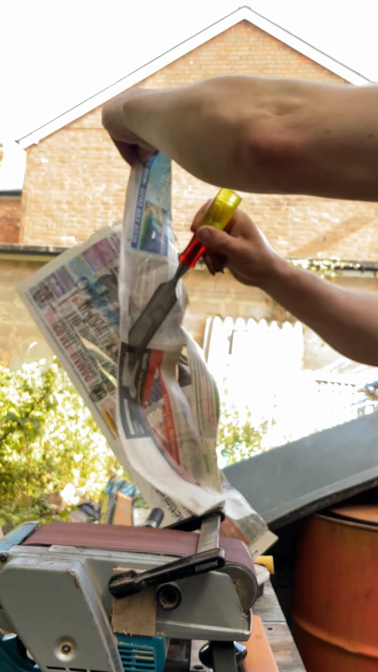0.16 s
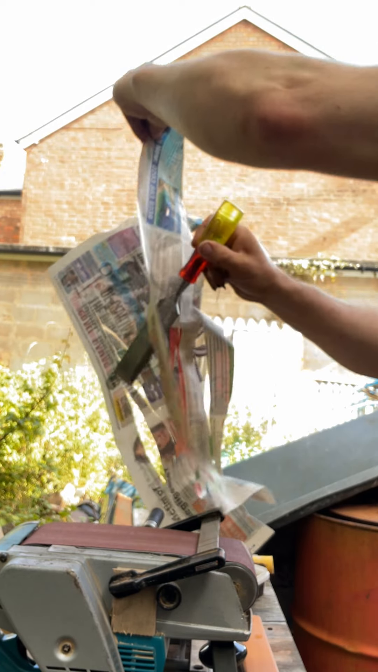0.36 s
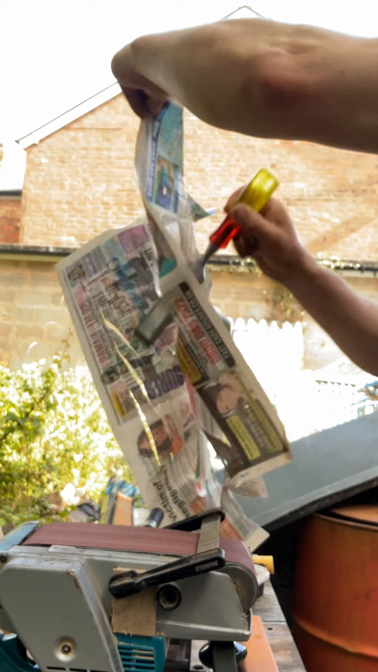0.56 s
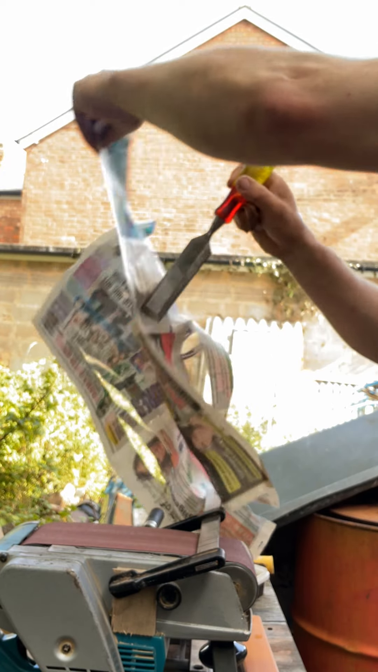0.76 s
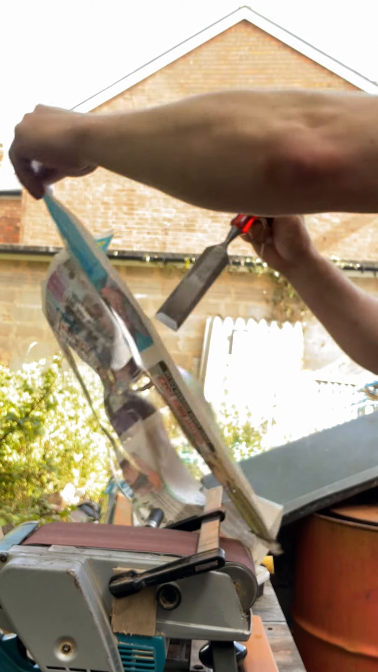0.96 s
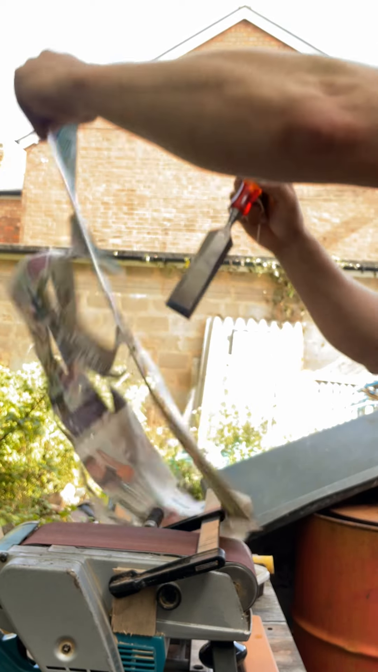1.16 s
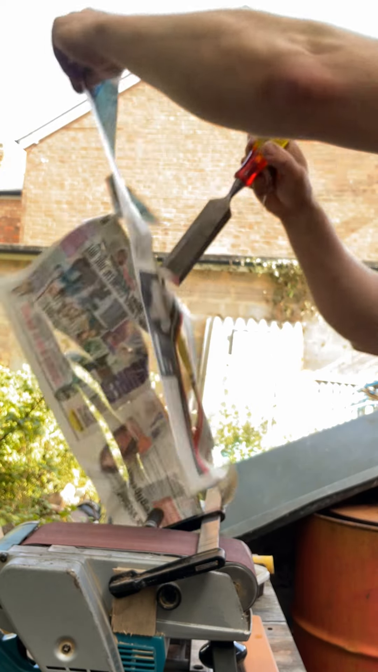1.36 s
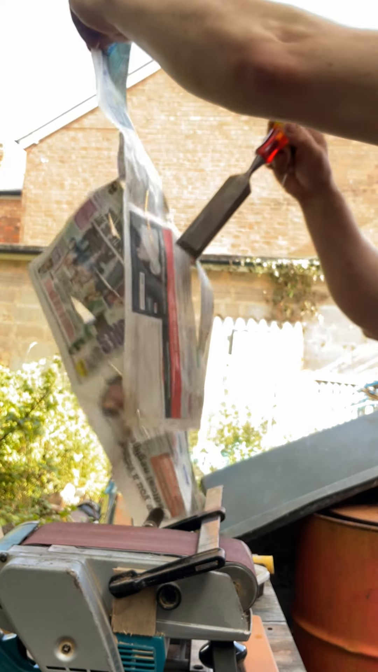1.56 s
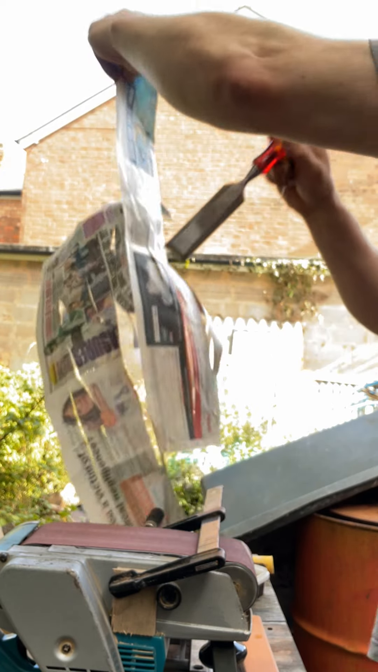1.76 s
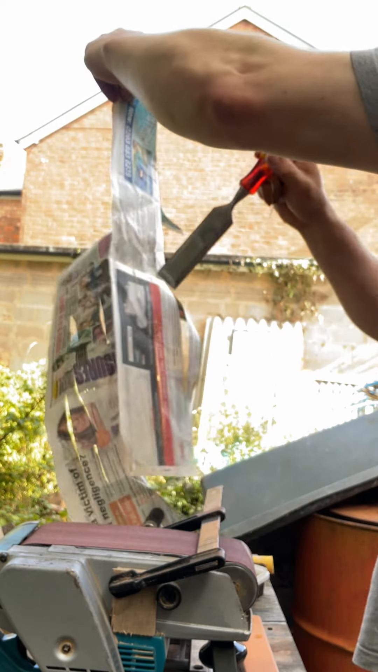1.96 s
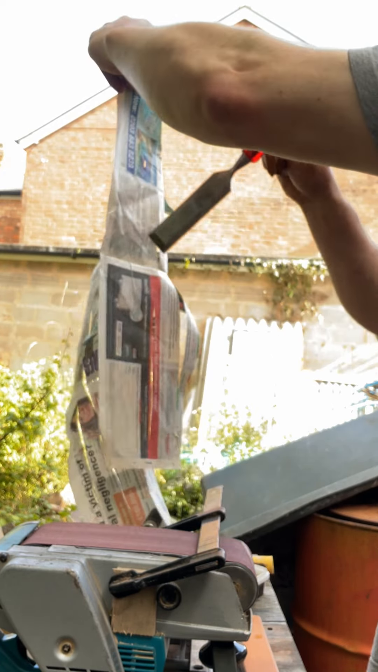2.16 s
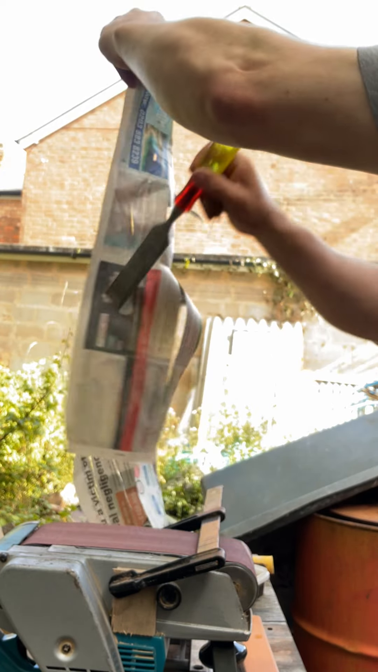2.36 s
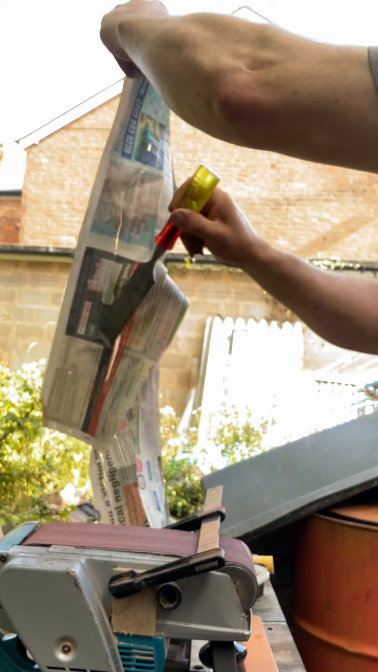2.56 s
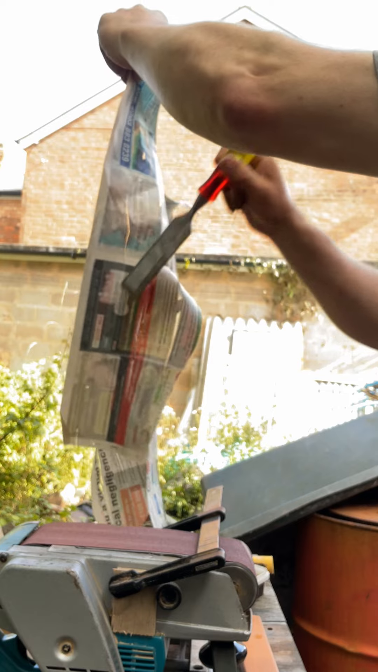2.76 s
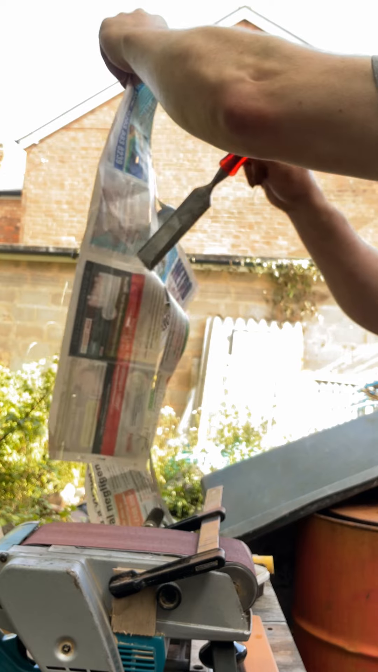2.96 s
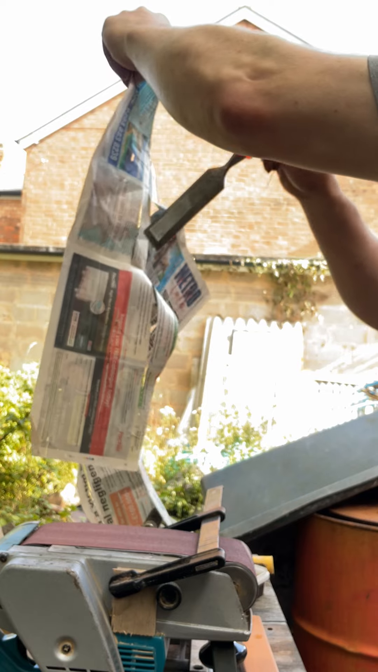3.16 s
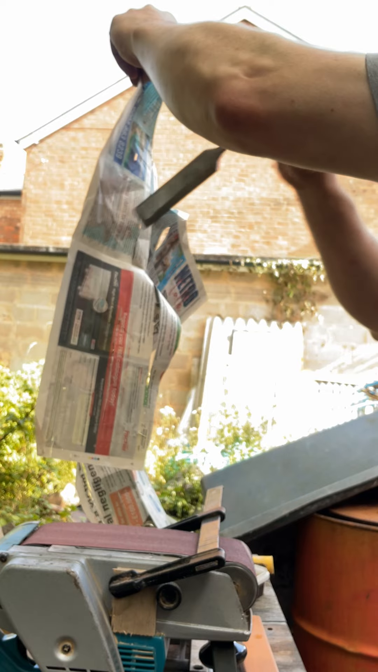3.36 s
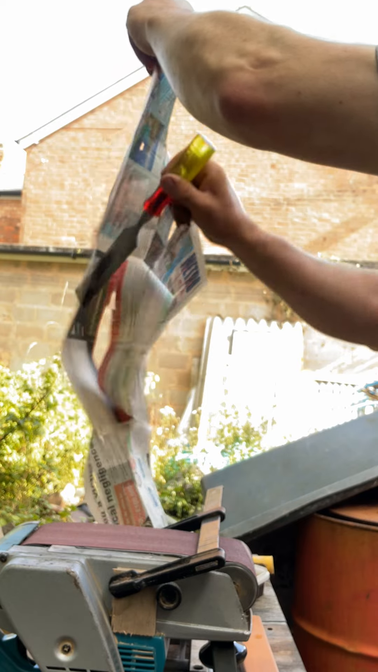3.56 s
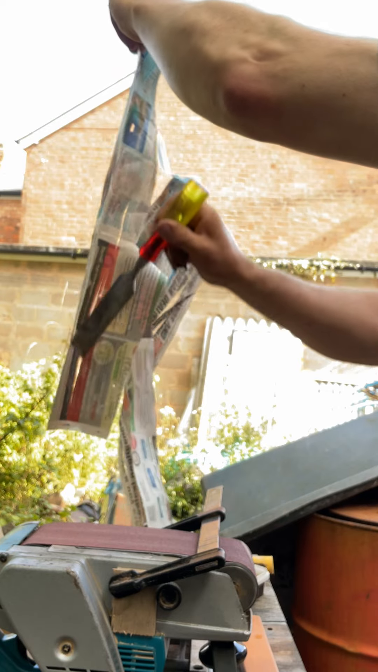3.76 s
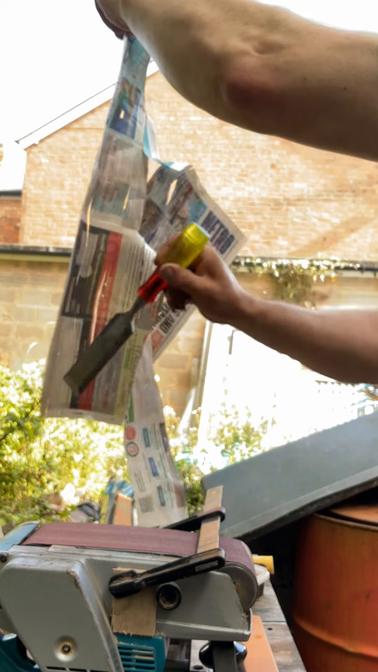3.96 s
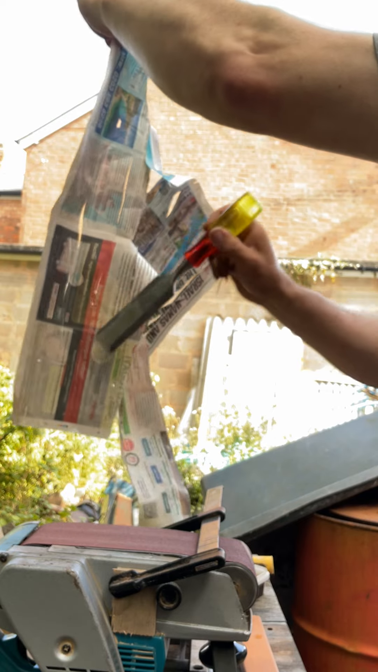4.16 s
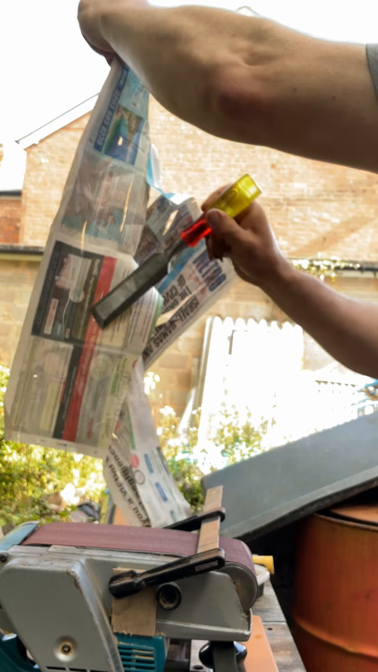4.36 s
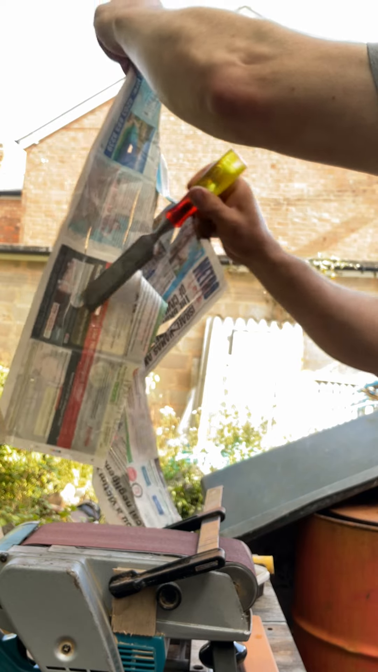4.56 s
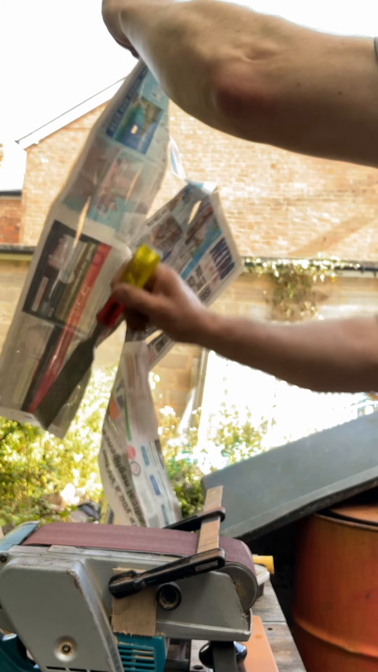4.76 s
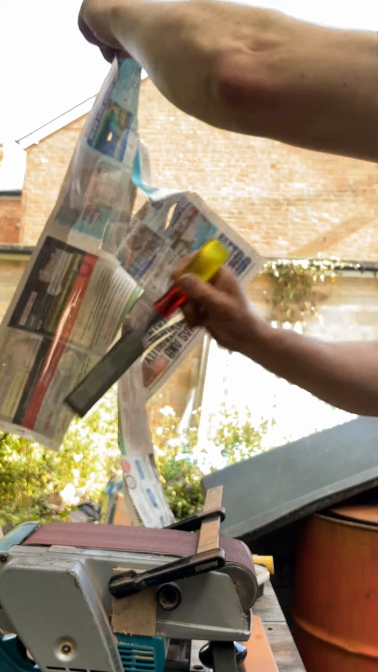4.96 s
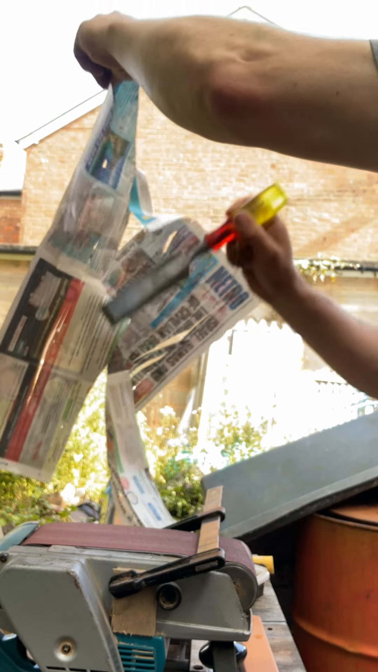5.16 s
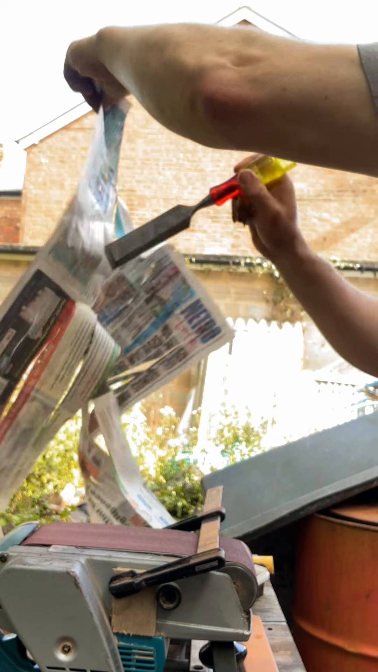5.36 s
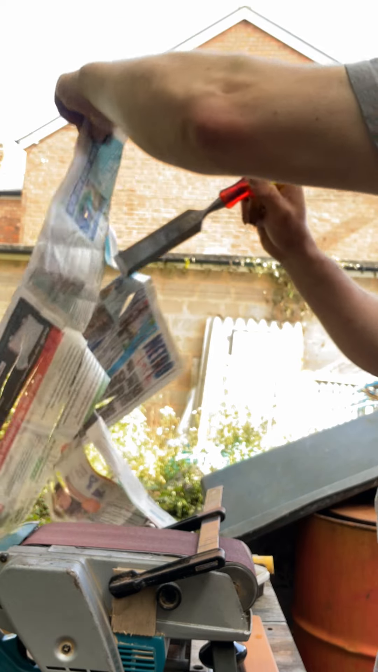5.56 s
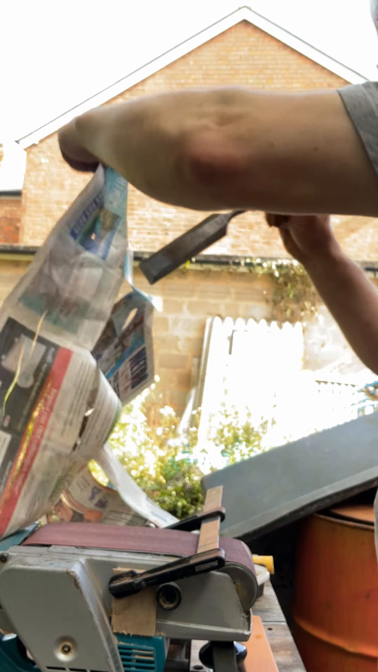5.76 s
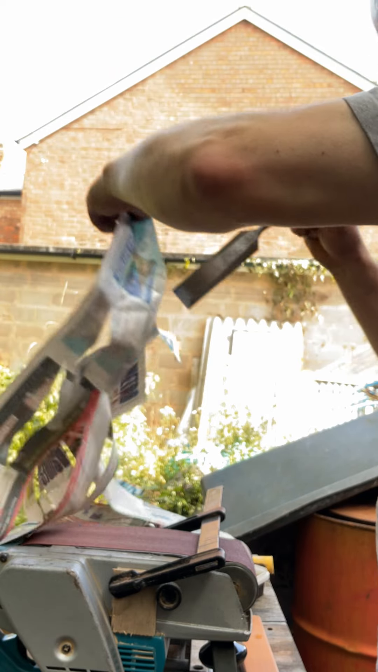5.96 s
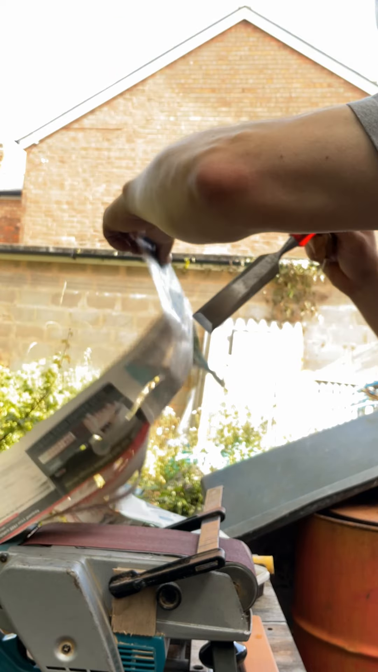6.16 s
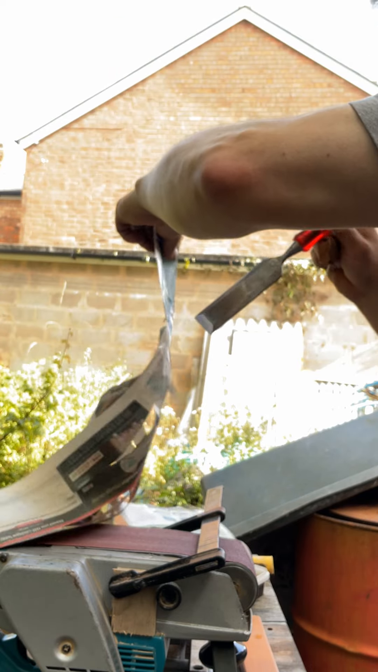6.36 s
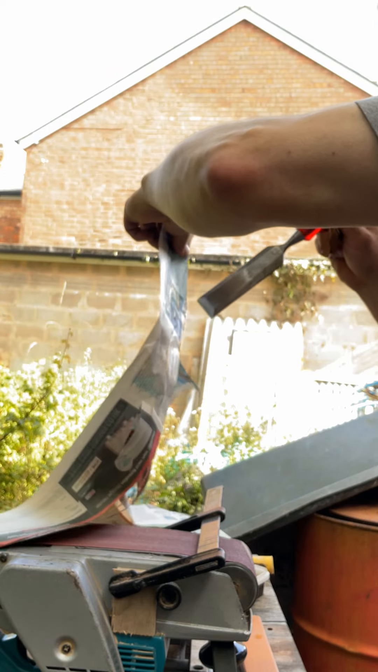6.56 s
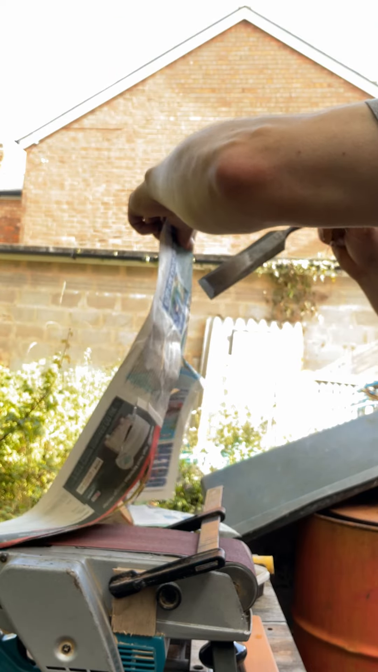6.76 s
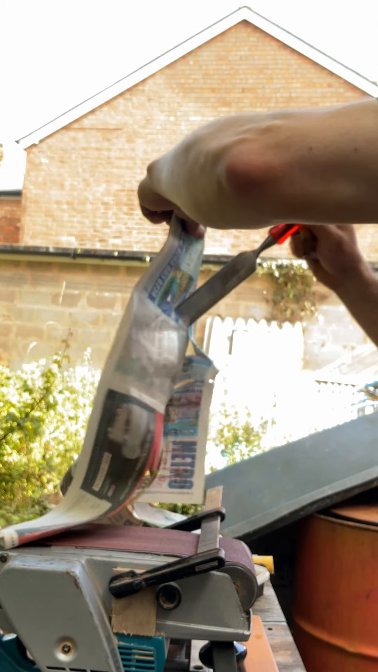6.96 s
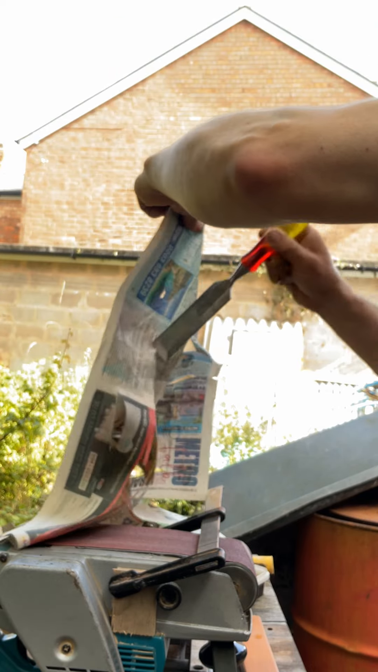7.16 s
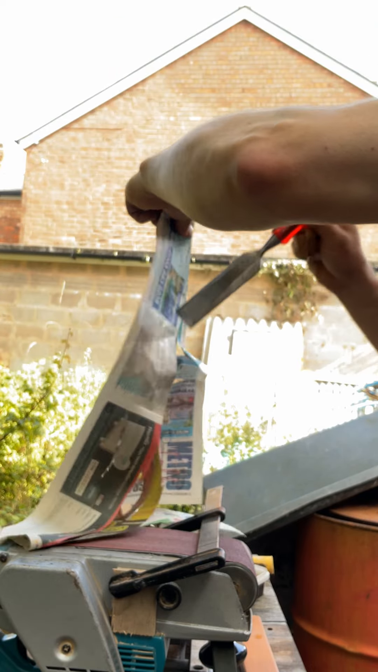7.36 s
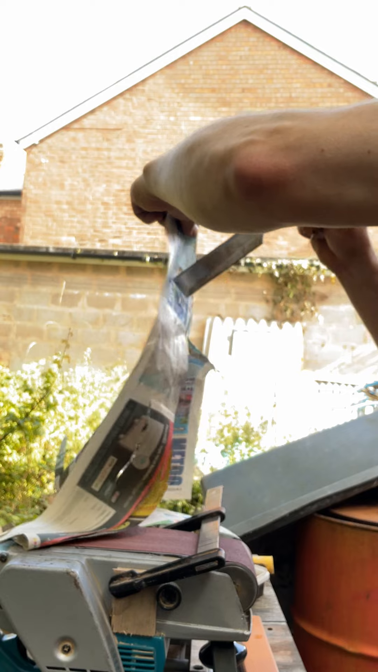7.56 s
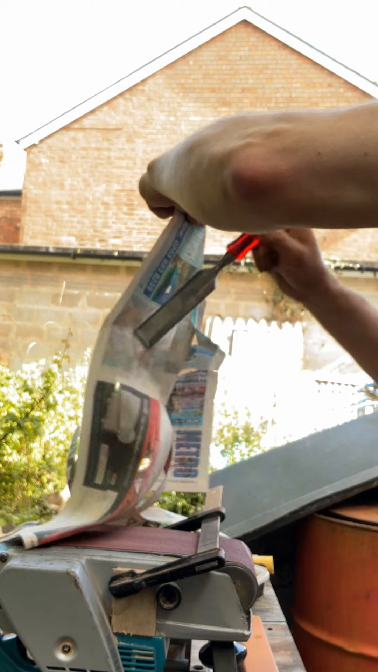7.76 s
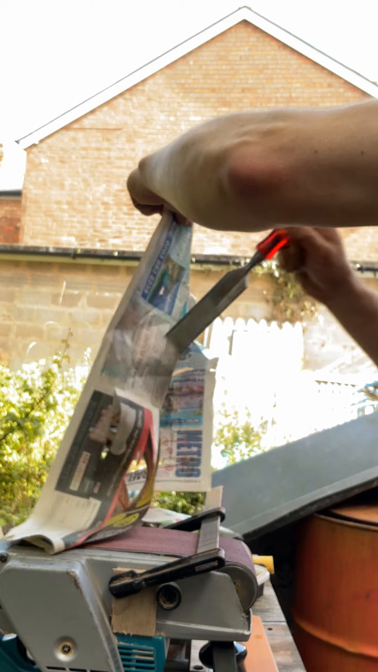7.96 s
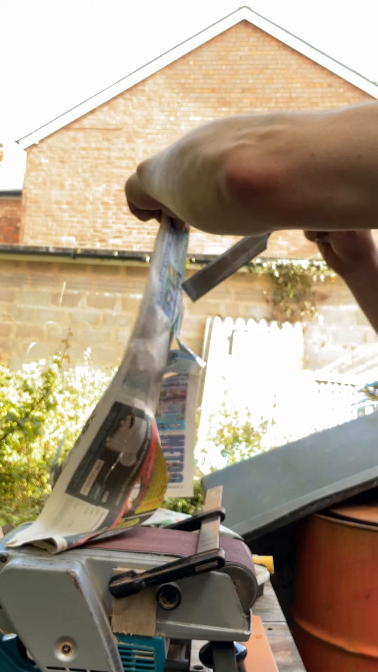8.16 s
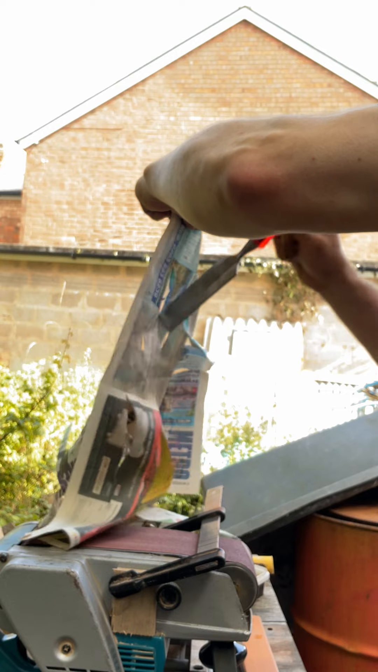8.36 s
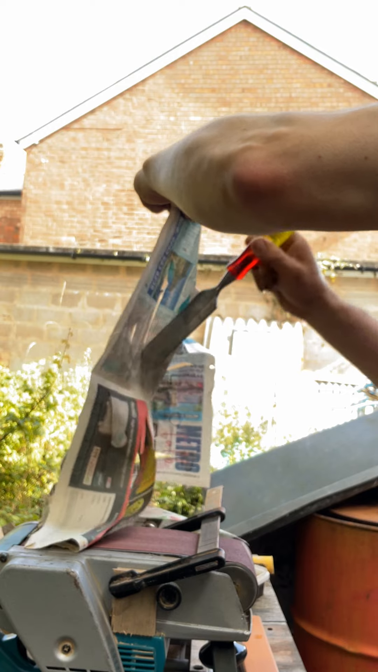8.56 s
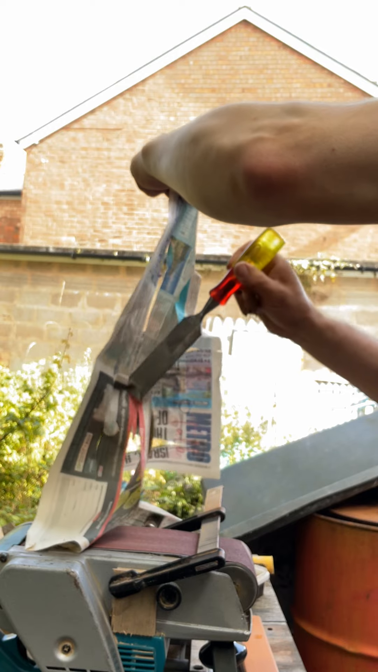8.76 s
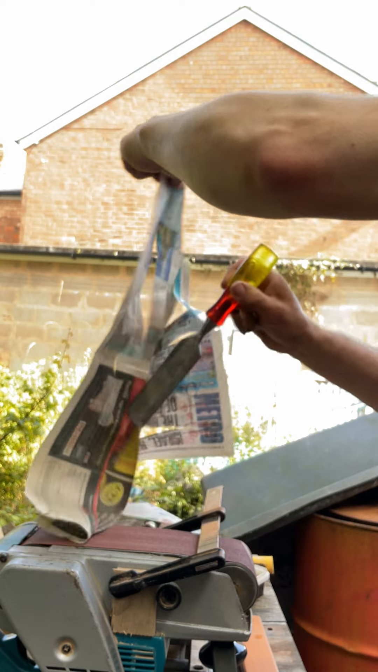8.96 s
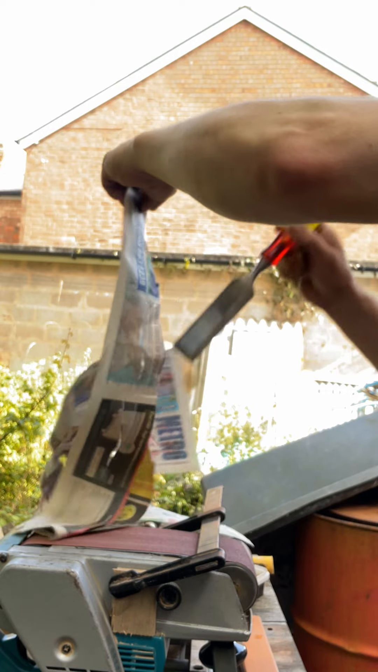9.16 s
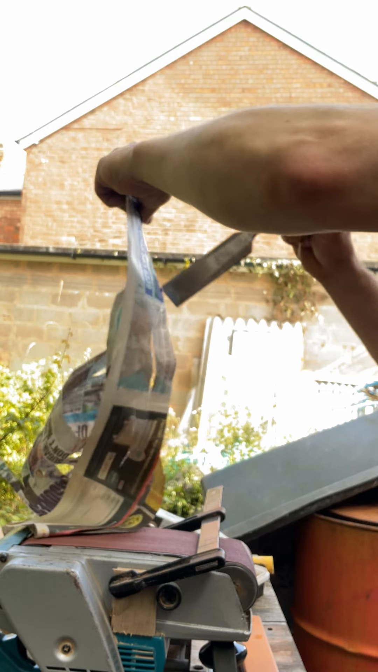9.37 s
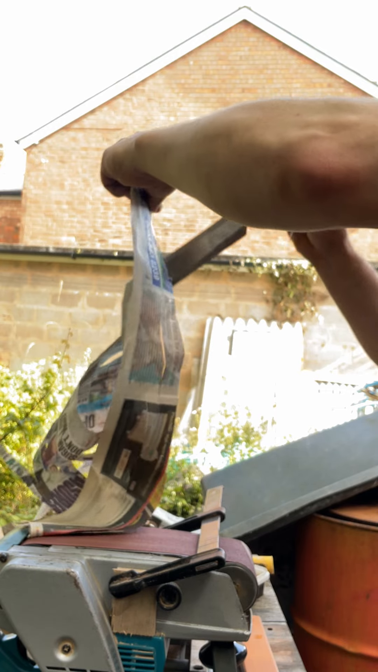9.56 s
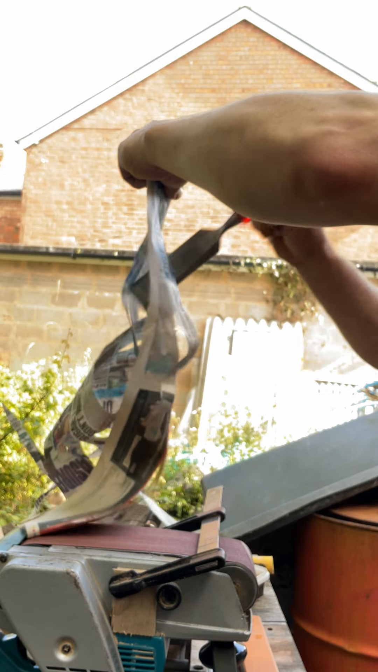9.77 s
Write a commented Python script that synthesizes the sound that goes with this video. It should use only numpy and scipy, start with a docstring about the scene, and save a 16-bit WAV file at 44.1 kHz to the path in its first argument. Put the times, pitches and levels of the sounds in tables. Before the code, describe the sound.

A sharp chisel slices hanging newspaper close by, in a walled yard with a slight echo. Short, hissing rips come from the start until about 1.6 seconds, and the sheet snaps taut with a loud flap at 0.6. A brief cut follows at 2.3, then a stronger slice with a sharp crack around 3.5, and another quick rip at 4.7. Between strokes, loose strips brush together and creases pop. From 5 to 6.5 seconds the paper only rustles and ticks softly. Slicing resumes around 6.9 and 7.6, then a run of cuts from 8.3 builds to a strong, crackling tear near 8.9. Light rustling leads to one last small cut at 9.7. Faint, distant traffic continues throughout, with low rumble, tyre noise and gliding engines, and a faint wavering whine from about 4.3 to 5.5 seconds.

```python
"""A workbench in a walled yard: a sharp chisel slices a hanging sheet of newspaper.
Each stroke snaps a dense stream of fibres that shakes the sheet. Between strokes loose strips brush
each other, creases buckle and pop, and the sheet flaps taut. The walls echo the paper.
Far traffic drones behind: rumble, tyre roar, gliding engines and one brief wavering whine."""
import sys
import numpy as np
from scipy import signal
from scipy.fft import rfft, irfft, next_fast_len
from scipy.io import wavfile
from scipy.ndimage import uniform_filter1d, map_coordinates

SR = 44100
rng = np.random.default_rng(int(sys.argv[2]) if len(sys.argv) > 2 else 0)


def log_audio(samples):
    """Write samples as a 16-bit WAV file to the path given in sys.argv[1]."""
    # one column per channel
    frames = np.atleast_2d(samples).T
    # limit to full scale, then quantise
    limited = np.clip(frames, -1, 1)
    pcm = np.round(limited * 32767).astype(np.int16)
    wavfile.write(sys.argv[1], SR, pcm)


N = 432180
TIME = np.arange(N) / SR

# Blade strokes. Each row: start, rise and length in seconds, tearing level in dB, its change by the end
# in dB, fade in dB/s, flutter, rasp and fizz in dB re tearing (before trims), strip resonance in Hz.
STROKES = [(-0.0, 0.0013, 0.25, -43.5, -2.5, 290, -5.5, 2.2, 2.1, 1320),
           (0.38, 0.07, 0.18, -41.5, -2, 112, -10, -7.5, 3.5, 2300),
           (1.148, 0.021, 0.039, -46, -3, 133, -15, -2.5, -0.2, 2400),
           (1.231, 0.015, 0.016, -44.5, 1.5, 150, -11, -10.5, 3.5, 2400),
           (1.298, 0.1, 0.18, -41, 1, 196, -11.5, -7, 2, 2400),
           (2.307, 0.076, 0.076, -42.5, 3.5, 252, -17, -9.5, -4, 2700),
           (3.462, 0.028, 0.098, -34, -3.5, 264, -15.5, -6, 4, 2800),
           (3.57, 0.051, 0.25, -40.5, -12.5, 269, -12.5, -7.8, 6.5, 2400),
           (4.608, 0.092, 0.044, -41.5, 9, 287, -28, -8.2, 0.8, 2490),
           (4.695, 0.022, 0.031, -40, -1, 264, -12, -16, 6.5, 2440),
           (6.887, 0.058, 0.12, -44.0, 0, 151, -13.5, -4.5, 0.2, 2200),
           (7.085, 0.05, 0.092, -43, 0, 193, -8, -2, 3, 2200),
           (7.618, 0.12, 0.18, -42, -0.5, 182, -13, -4.5, 2, 2370),
           (8.276, 0.052, 0.12, -47.5, 4.5, 183, -6.5, -3.5, 6.5, 1910),
           (8.398, 0.029, 0.22, -52, 5, 157, -2.5, -3.5, 6.5, 1650),
           (8.586, 0.16, 0.14, -42, -1, 149, -6.5, 1, 4, 1700),
           (8.773, 0.012, 0.046, -39, -0.5, 122, -24, -11.4, 4, 2300),
           (8.811, 0.081, 0.1, -35.7, -4.5, 195, -9, -1.5, 3, 2200),
           (9.698, 0.076, 0.12, -49, 4.5, 198, -13, -2, 3, 2200)]


def amp(db):
    """Decibels to gain."""
    return 10 ** (np.asarray(db) / 20)


def unit(x):
    """Scale to rms 1."""
    return x / np.sqrt(np.mean(x ** 2) + 1e-20)


def along(points, hz):
    """Interpolate (Hz, value) points on a log axis."""
    knots_hz, values = np.transpose(points)
    return np.interp(np.log(hz + 1), np.log(knots_hz + 1), values)


def curves(rows):
    """One value per sample for each column after the time."""
    times_s, *columns = np.transpose(rows)
    return [np.interp(TIME, times_s, column) for column in columns]


def wobble(rate_hz):
    """Smooth random curve, rate_hz knots a second."""
    return map_coordinates(rng.standard_normal(8192), [TIME * rate_hz], mode="wrap")


def below(hz, edge_hz, order=8):
    """Low-pass gain."""
    return 1 / np.sqrt(1 + (hz / edge_hz) ** order)


def above(hz, edge_hz, order=8):
    """High-pass gain."""
    return np.sqrt(1 - below(hz, edge_hz, order) ** 2)


def filtered(x, response):
    """Apply a gain given as a function of Hz."""
    n = x.shape[-1]
    padded = next_fast_len(n + 8192)
    return irfft(rfft(x, padded) * response(np.fft.rfftfreq(padded, 1 / SR)), padded)[..., :n]


def band(x, colour_db, lo_hz, hi_hz):
    """Colour, band-pass and scale to rms 1."""
    return unit(filtered(x, lambda hz: amp(colour_db(hz)) * above(hz, lo_hz) * below(hz, hi_hz)))


def causal(gain):
    """Minimum-phase response with this gain: rings only after a blow."""
    cepstrum = irfft(np.log(np.maximum(gain, 1e-6)))
    half = len(cepstrum) // 2
    cepstrum[1:half] *= 2
    cepstrum[half + 1:] = 0
    return np.exp(rfft(cepstrum))


def add(track, start_s, sound):
    """Mix a sound in at a time."""
    part = track[max(round(start_s * SR), 0):][:len(sound)]
    part += sound[:len(part)]


def traffic():
    """Far rumble, tyre roar and faint hiss: three bands of noise."""
    # Each row: time in seconds, rumble and tyre roar in dB before trims.
    levels = [(0.0, -64.5, -59.5), (1.3, -67.5, -61.5), (2.3, -72.5, -62), (3.3, -69, -66.5),
              (4.2, -70.5, -66), (4.9, -74, -61), (6.0, -67.5, -58.5), (6.7, -73.5, -64), (8.4, -68, -57.5),
              (9.8, -71, -57.5)]
    # Background spectrum. Each row: frequency in Hz, gain in dB.
    spectrum = [(15, -34), (25, -7), (37, -5), (96, -14.5), (211, -16), (284, -13), (403, -15), (437, -14),
                (791, -20), (955, -18.5), (1780, -31), (7030, -32.5), (7830, -32.5), (10500, -34.5),
                (15800, -31)]
    rumble_db, roar_db = curves(levels)
    air = lambda lo_hz, hi_hz: band(rng.standard_normal(N), lambda hz: along(spectrum, hz), lo_hz, hi_hz)
    rumble = amp(rumble_db + 2) * air(48, 140)
    roar = amp(roar_db - 4.5) * air(140, 1800)
    hiss = air(1800, SR) * amp(-71.5 + 0.5 * wobble(3.4))
    return rumble + roar + hiss


def drone(pitch_hz, rough, scatter_hz):
    """Far tone; many paths smear the rough share of its power."""
    phase = 2 * np.pi * np.cumsum(pitch_hz) / SR
    share = np.clip(rough, 0, 1)
    smear = wobble(scatter_hz) * np.sin(phase) + wobble(scatter_hz) * np.cos(phase)
    return np.sqrt(2 * (1 - share)) * np.sin(phase) + np.sqrt(share) * smear


def engines(fall_db=8.5):
    """Far engines swell and fade, gliding as they change speed."""
    # Each row: peak time and half length in seconds, pitch in Hz, glide in Hz/s, dB before trim.
    passes = [(1.722, 0.39, 75.5, 12, -65.5), (2.946, 0.55, 96, 17.5, -71.5),
              (3.383, 0.065, 59, 11.5, -59.5), (4.096, 0.38, 283, -86.5, -72.5),
              (4.147, 0.51, 85.7, -11.5, -70.5), (5.1, 0.29, 97, 28, -69.5), (5.62, 0.38, 55.3, 3, -62.5),
              (7.2, 0.92, 81, 20.5, -70), (9.395, 1.34, 92.5, -3.5, -71)]
    out = np.zeros(N)
    for peak_s, half_s, pitch_hz, glide_hz_per_s, db in passes:
        t = TIME - peak_s
        level_db = np.maximum(db + 3 - fall_db * (t / half_s) ** 2, -200)
        out += amp(level_db) * drone(pitch_hz + glide_hz_per_s * t, rough=0.44, scatter_hz=12)
    return out


def whine(fade_s=0.037):
    """A far, rough tone wavers up and back down."""
    # Each row: time in seconds, pitch in Hz, level in dB before trim, roughness from 0 to 1.
    contour = [(4.25, 360, -71, 0.7), (4.47, 399, -58.5, .8), (4.68, 430, -84, .7), (4.74, 440, -55.5, 0.3),
               (4.95, 427, -57, 0.58), (5.17, 417, -58.5, 0.83), (5.41, 349, -60.5, 0.37),
               (5.5, 349, -84, .6)]
    pitch_hz, db, rough = curves(contour)
    inside_s = np.minimum(TIME - contour[0][0], contour[-1][0] - TIME)
    gate = np.clip(inside_s / fade_s + 0.5, 0, 1)
    return gate * amp(db + 1) * drone(pitch_hz, rough, scatter_hz=226.3)


def wall_echo(x, build_s=0.004):
    """The walls answer, each frequency dying at its own speed."""
    # Each row: frequency in Hz, T60 in seconds.
    decay = [(150, 0.54), (1000, 0.46), (5000, 0.3), (15000, 0.25)]
    hz, t, spectra = signal.stft(rng.standard_normal(SR * 3 // 4), SR, nperseg=256)
    tail = signal.istft(spectra * amp(-60 * t / along(decay, hz)[:, None]), SR, nperseg=256)[1]
    tail *= 1 - np.exp(-np.arange(len(tail)) / SR / build_s)
    return signal.fftconvolve(x, tail / np.linalg.norm(tail))[:N]


def paper_colour_db(hz):
    """Fixed peaks and a dip that colour the paper's sound."""
    # Each row: centre and width in Hz, gain in dB.
    ripple = [(556, 120, 3), (1060, 220, 2.5), (1430, 160, 1), (1700, 215, -3.5), (2270, 230, 1.5),
              (4020, 300, 5), (4610, 140, 1.5), (4880, 190, 3)]
    return sum(db / (1 + (2 * (hz - centre_hz) / width_hz) ** 2) for centre_hz, width_hz, db in ripple)


def patchy(x, depth_db):
    """Resonances come and go as the sheet bends."""
    spectra = signal.stft(x, nperseg=512)[2]
    field = uniform_filter1d(rng.standard_normal(spectra.shape), size=4, axis=0)
    field = uniform_filter1d(field, size=14, axis=1)
    return signal.istft(spectra * amp(depth_db * unit(field)), nperseg=512)[1][:N]


def fibres(snaps_per_s, spread_db, clump_db, clump_hz, bundles_per_s, bundle_db):
    """Tiny uneven snaps in clumps; now and then a thick bundle breaks."""
    snaps = (rng.random(N) < snaps_per_s / SR) * rng.choice([-1, 1], N)
    sizes = amp(spread_db * np.clip(rng.standard_normal(N), -3, 2))
    bundles = (rng.random(N) < bundles_per_s / SR) * rng.uniform(-1, 1, N)
    clumps = amp(clump_db * wobble(clump_hz))
    return unit(unit(snaps * sizes * clumps) + amp(bundle_db) * bundles)


def gesture(start_s, rise_s, length_s, fade_db_per_s, change_db=0, catch_db=-20, catch_s=0.0021):
    """Gain of one movement: it catches, swells, holds and dies away."""
    t = np.maximum(TIME - start_s, 0)
    swell_db = catch_db * np.maximum(1 - t / rise_s, 0) ** 2
    hold_db = change_db * np.minimum(t / length_s, 1)
    release_db = -fade_db_per_s * np.maximum(t - length_s, 0)
    return np.minimum(t / catch_s, 1) * amp(np.maximum(swell_db + hold_db + release_db, -200))


def together(gains, db):
    """Movements at their own levels add in power."""
    return np.sqrt(amp(db) ** 2 @ gains ** 2)


def swaying(rise_s=0.034, fade_db_per_s=166):
    """Loose strips brush each other: tiny snaps, sparser than in a cut."""
    # Each row: start and length in seconds, rustle in dB, fizz in dB re rustle (both before trims).
    sways = [(0.26, 0.16, -57.5, 4), (0.72, 0.076, -62, 1), (0.781, 0.052, -55, 7), (0.851, 0.054, -72, -6),
             (1.084, 0.082, -59.5, -3), (1.772, 0.025, -68, 7), (2.494, 0.038, -60.5, 2.5),
             (2.675, 0.03, -68, -4), (3.873, 0.028, -66.5, 0), (4.319, 0.035, -77.5, 9),
             (4.934, 0.082, -75, 8.5), (5.012, 0.232, -68.5, -4), (5.278, 0.14, -65.5, 7),
             (5.51, 0.068, -62, 2), (5.646, 0.048, -67.5, 4), (5.735, 0.17, -57, -6),
             (5.903, 0.074, -58.5, 4.5), (6.029, 0.076, -54, 7), (6.14, 0.037, -58.0, 2),
             (6.231, 0.075, -59.8, 5), (6.38, 0.19, -74.5, -1), (9.008, 0.106, -61, 0),
             (9.123, 0.033, -50.5, 3.5), (9.22, 0.12, -60, 5), (9.44, 0.043, -66, 5),
             (9.585, 0.029, -67.5, -10)]
    # Each row: frequency in Hz, gain in dB.
    spectrum = [(290, -31), (500, 0), (649, -17), (817, -2.5), (1540, 1), (3570, -5), (4060, -4),
                (8610, -17), (15100, -10), (15800, -9)]
    gains = np.array([gesture(start_s, rise_s, length_s, fade_db_per_s)
                      for start_s, length_s, *_ in sways])
    rustle_db, fizz_db = np.transpose(sways)[2:]
    snaps = fibres(7600, spread_db=1, clump_db=1.94, clump_hz=120, bundles_per_s=83, bundle_db=12.5)
    paper_db = lambda hz: along(spectrum, hz) + 0.46 * paper_colour_db(hz)
    rustle = together(gains, rustle_db + 0.9) * band(patchy(snaps, depth_db=3), paper_db, 420, 8200)
    fizz = together(gains, rustle_db + fizz_db - 0.5) * band(snaps, paper_db, 7230, SR)
    return rustle + fizz


def ticks(gap_s=0.066, peak_db=-53, centre_hz=1030, treble_db=-37):
    """Rows for creases(): small folds give way at random as the hand bends the sheet."""
    # Each row: start and end in seconds.
    bends = [(2.075, 2.22), (5.06, 6.45)]
    slots_s = np.concatenate([np.arange(start_s, end_s, gap_s) for start_s, end_s in bends])
    return [(slot_s + gap_s * late / 3, peak_db + 1.15 * size, centre_hz * np.exp(0.25 * pitch), treble_db)
            for slot_s, (late, size, pitch) in zip(slots_s, rng.standard_normal((len(slots_s), 3)))]


def creases(ring_cycles=20, settle_s=0.0071, settle_db=-11.5, shiver_db=-20, shiver_cycles=150):
    """A crease buckles, settles with a weaker pop and shivers; small patches stop soonest."""
    # Each row: start in seconds, peak in dB, centre in Hz, relative treble in dB before scaling.
    pops = [(0.301, -37, 2860, -17), (0.941, -46.5, 1510, -18), (1.036, -47.5, 1020, -21),
            (1.111, -37.5, 2600, -16), (1.243, -27.5, 4440, -10), (1.763, -47.5, 990, -36),
            (1.831, -46, 1200, -35), (2.242, -53.5, 1000, -32), (2.326, -31.5, 1690, -4),
            (2.508, -43, 2140, -26), (2.619, -51.5, 1610, -31), (2.791, -53, 2520, -19),
            (3.467, -33.5, 4160, -13), (3.538, -16.5, 4300, -11), (3.558, -27.5, 2000, -20),
            (4.621, -45, 1110, -19), (4.72, -24, 2160, 2), (5.036, -46, 2110, -34),
            (5.096, -37.5, 5070, -30), (5.219, -37.5, 1510, -16), (5.339, -43, 4416, -18),
            (5.493, -48.5, 1760, -28), (5.667, -40.5, 1810, -38), (5.772, -39.5, 1350, -27),
            (5.797, -38, 1350, -17), (5.896, -35, 1390, -31), (6.033, -36, 1520, -8),
            (6.062, -40, 1700, -8), (6.335, -43, 2180, -32), (6.869, -46, 1260, -30),
            (6.909, -33, 2880, -24), (7.345, -44, 945, -29), (7.624, -44, 1430, -31),
            (8.296, -38, 2970, -13), (8.892, -23.5, 2340, -29), (8.952, -26, 1700, -10),
            (9.089, -39.5, 2400, -6), (9.286, -37.5, 1420, -6), (9.733, -31.5, 3650, 0)]
    out, t = np.zeros(N), np.arange(8192) / SR
    hz = np.fft.rfftfreq(len(t), 1 / SR)
    buckle = lambda cycles: amp(-60 * cycles / ring_cycles) * (1 - np.exp(-cycles))
    for start_s, peak_db, centre_hz, treble_db in pops + ticks():
        delay_s = settle_s * np.exp(0.3 * rng.standard_normal())
        settle = amp(settle_db) * buckle(np.maximum(t - delay_s, 0) * centre_hz)
        shiver = amp(shiver_db - 60 * t * centre_hz / shiver_cycles)
        burst = rng.standard_normal(len(t)) * (buckle(t * centre_hz) + settle + shiver)
        top = below(hz, 1.01 * centre_hz, order=5) + 0.23 * amp(treble_db)
        patch = above(hz, 0.78 * centre_hz, order=6) * top * below(hz, 11000)
        pop = irfft(rfft(burst) * causal(patch))
        add(out, start_s, amp(peak_db) * pop / np.abs(pop).max())
    return out


def flaps(rebound_s=0.0053, rebound_db=-2.5, shudder_db=-25, shudder_t60_s=0.11):
    """The sheet cracks taut like a sail, rebounds once and shudders."""
    # Each row: start in seconds, peak in dB, low-pass edge in Hz.
    cracks = [(.587, -15, 2700), (4.593, -41.5, 700)]
    # Each row: frequency in Hz, gain in dB.
    spectrum = [(50, -10), (95, -5), (220, -2.5), (400, -4), (700, 3.5), (1050, 0), (1700, -10), (2700, -3),
                (4300, -10.5), (9000, -33)]
    out, t = np.zeros(N), np.arange(8192) / SR
    hz = np.fft.rfftfreq(len(t), 1 / SR)
    rebound = amp(rebound_db) * below(hz, 1300, order=4) * np.exp(-2j * np.pi * hz * rebound_s)
    dispersion = np.exp(-1j * 0.094 * np.sqrt(hz))  # low bending waves travel more slowly
    for start_s, peak_db, edge_hz in cracks:
        shudder = rfft(rng.standard_normal(len(t)) * amp(shudder_db - 60 * t / shudder_t60_s))
        body = causal(amp(along(spectrum, hz)) * below(hz, edge_hz, order=4))
        flap = irfft((1 + rebound + shudder) * dispersion * body)
        add(out, start_s, amp(peak_db) * flap / np.abs(flap).max())
    return out


def taut_strip(x, lift_db=1, width_octaves=0.34, sag_hz_per_s=900):
    """Lift the strip's resonance, which sinks as each cut grows longer."""
    hz, t, spectra = signal.stft(x, SR, nperseg=512)
    ring_hz = np.full(len(t), STROKES[0][-1], float)
    for start_s, _, length_s, *_, first_hz in STROKES:
        sag_hz = sag_hz_per_s * np.clip(t - start_s, 0, length_s)
        ring_hz = np.where(t < start_s, ring_hz, first_hz - sag_hz)
    detune = np.log2((hz[:, None] + 1) / ring_hz) / width_octaves
    return signal.istft(spectra * amp(lift_db * np.exp(-detune ** 2)), SR, nperseg=512)[1][:N]


def stroke_gains(lag_share):
    """One gain curve per stroke, delayed by a share of its rise."""
    return np.array([amp(db) * gesture(start_s + lag_share * rise_s, rise_s, length_s, fade, change_db)
                     for start_s, rise_s, length_s, db, change_db, fade, *_ in STROKES])


def slicing():
    """Fibres part at the edge with tearing and fizz; the sheet they shake rasps and flutters."""
    # Each row: frequency in Hz, gain in dB.
    spectrum = [(71, -40.5), (120, -3), (392, 3.5), (667, -3.5), (818, -1.5), (1110, -0.5), (1740, -1.5),
                (2370, -3.5), (3420, -5), (4020, -7.5), (4360, -8), (5810, -6.5), (7270, -7.5), (14900, 1),
                (15800, 1)]
    gains = stroke_gains(lag_share=0)
    late_gains = stroke_gains(lag_share=0.13)  # fizz comes once the blade has gathered speed
    flutter_db, rasp_db, fizz_db = np.transpose(STROKES)[6:9]
    snaps = fibres(14000, spread_db=2, clump_db=1.17, clump_hz=300, bundles_per_s=150, bundle_db=16.5)
    snaps = taut_strip(patchy(snaps, depth_db=3)) * amp(1.5 * wobble(45))
    paper_db = lambda hz: along(spectrum, hz) + paper_colour_db(hz)
    flutter = together(gains, flutter_db - 1.13) * band(snaps, paper_db, 165, 820)
    rasp = together(gains, rasp_db - 3.33) * band(snaps, paper_db, 900, 1660)
    tearing = amp(-1.83) * np.linalg.norm(gains, axis=0) * band(snaps, paper_db, 1970, 6900)
    fizz = together(late_gains, fizz_db - 0.61) * band(snaps, paper_db, 5730, SR)
    return flutter + rasp + tearing + fizz


def scene():
    """Close paper, its echo and the far background, in mono."""
    rubbing = slicing() + swaying()
    pops = creases() + flaps()
    echo = wall_echo(amp(-14) * rubbing + amp(-17) * pops)
    return (rubbing + pops + echo + traffic() + engines() + whine())[None]


def record(dry, low_hz=43, top_hz=15830):
    """Cut the deep bass and everything above top_hz."""
    return filtered(dry, lambda hz: above(hz, low_hz, order=16) * (hz < top_hz))


dry = scene()
out = record(dry)
log_audio(out)
```